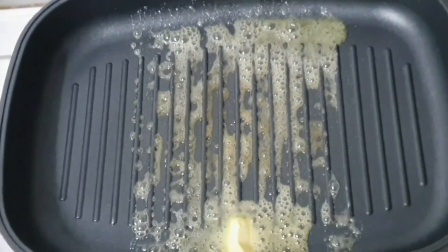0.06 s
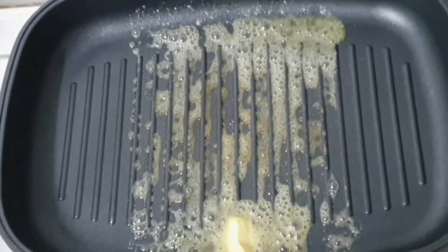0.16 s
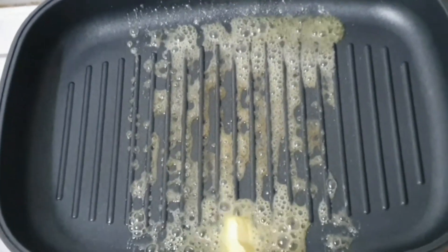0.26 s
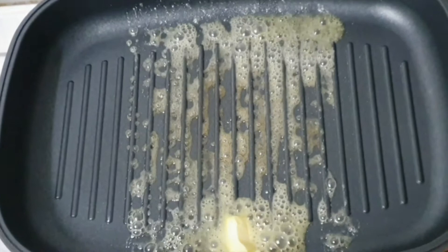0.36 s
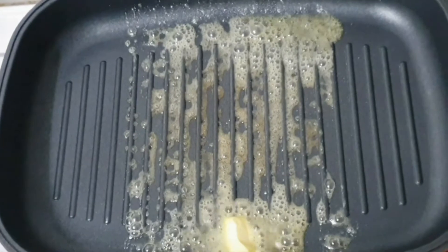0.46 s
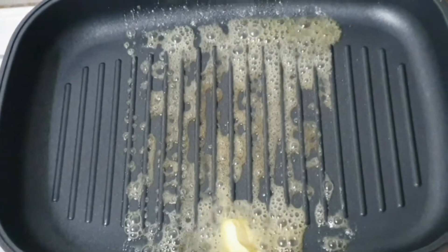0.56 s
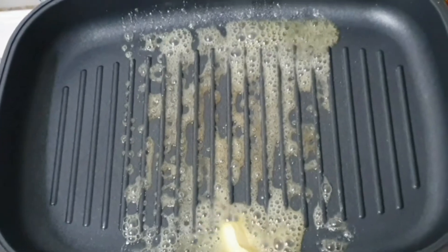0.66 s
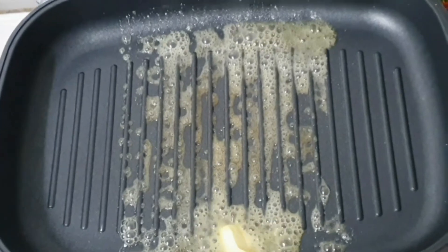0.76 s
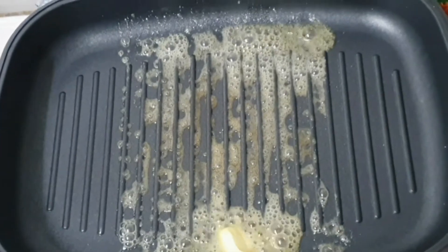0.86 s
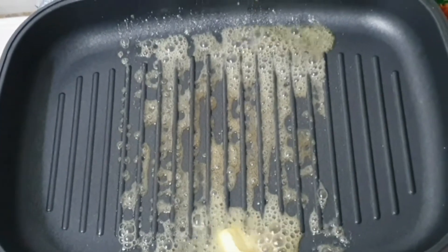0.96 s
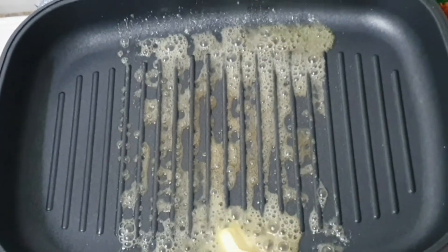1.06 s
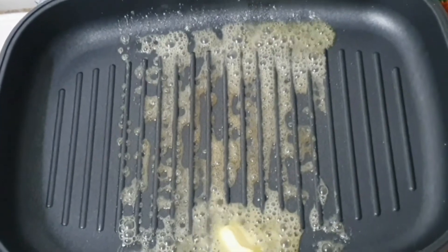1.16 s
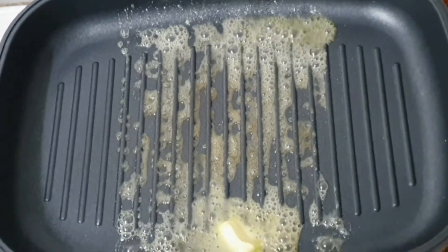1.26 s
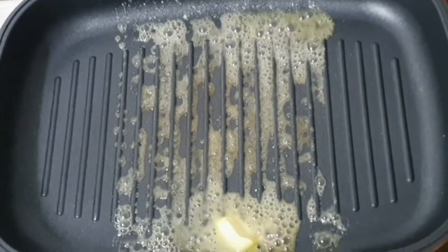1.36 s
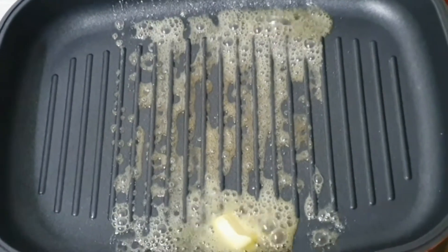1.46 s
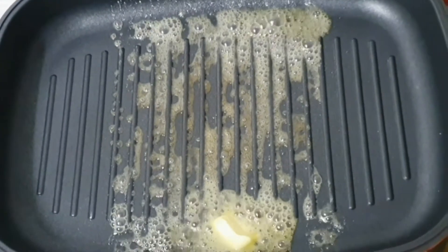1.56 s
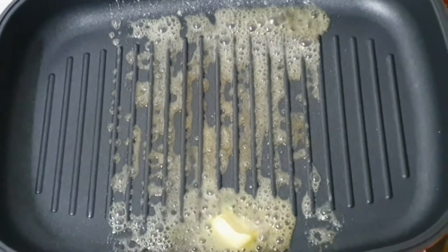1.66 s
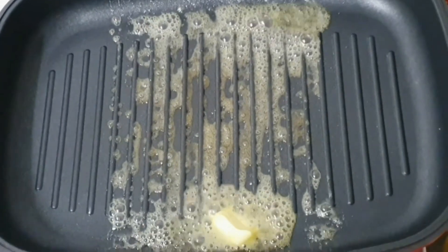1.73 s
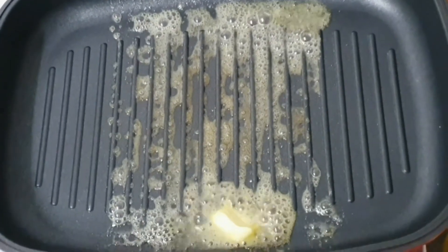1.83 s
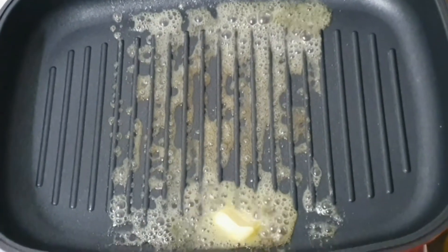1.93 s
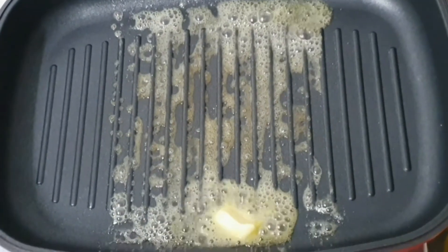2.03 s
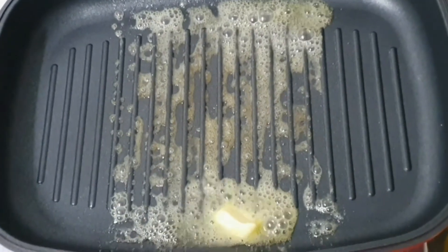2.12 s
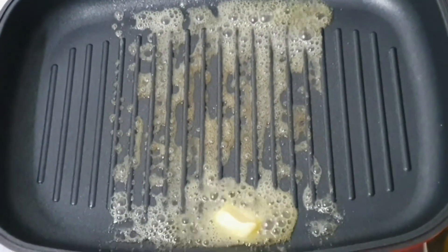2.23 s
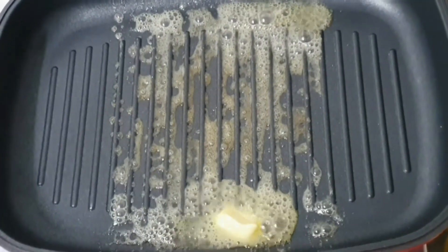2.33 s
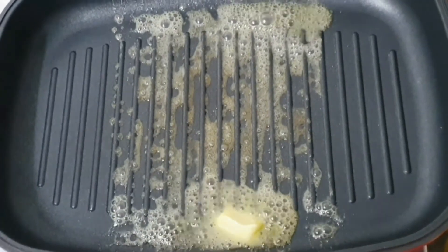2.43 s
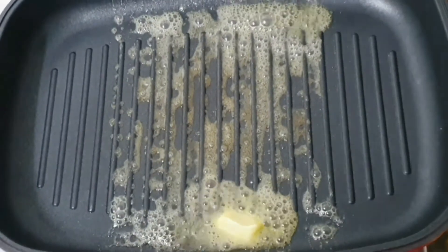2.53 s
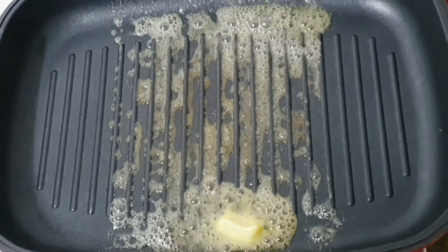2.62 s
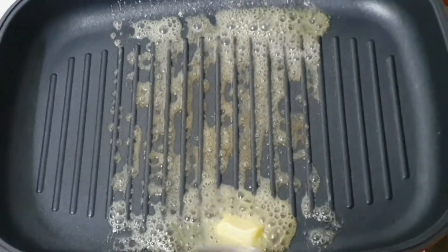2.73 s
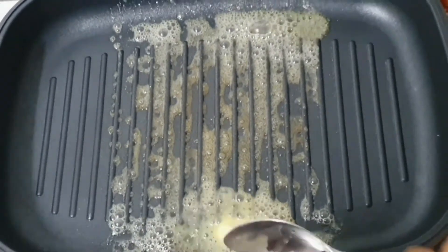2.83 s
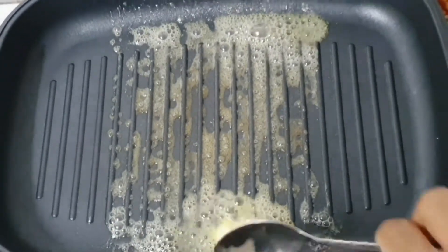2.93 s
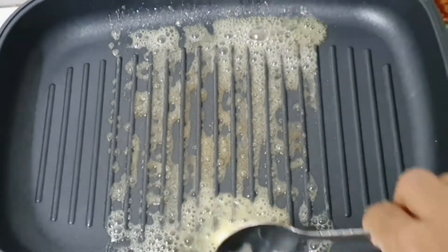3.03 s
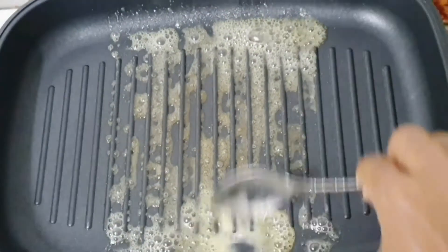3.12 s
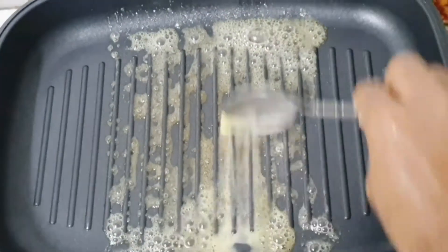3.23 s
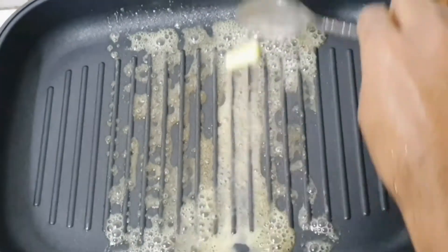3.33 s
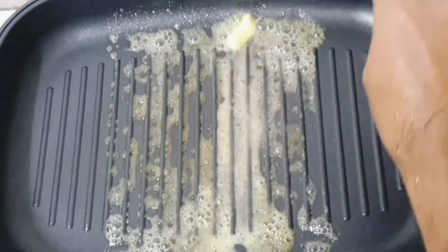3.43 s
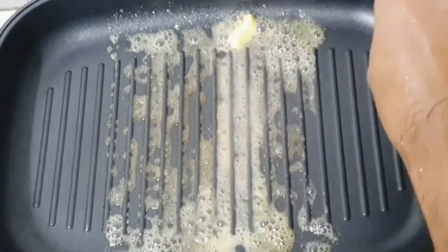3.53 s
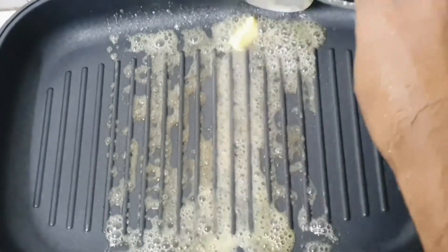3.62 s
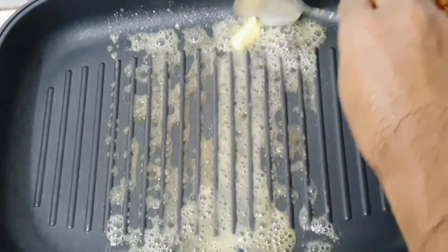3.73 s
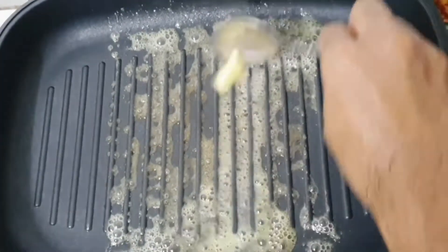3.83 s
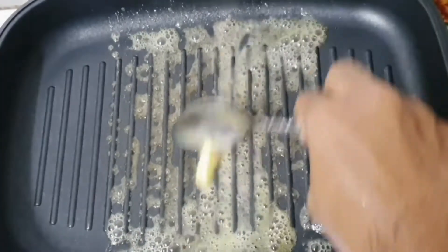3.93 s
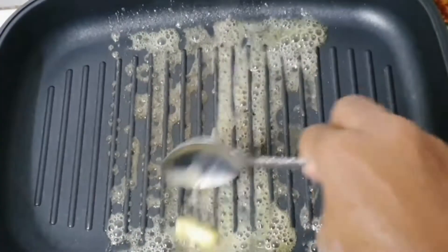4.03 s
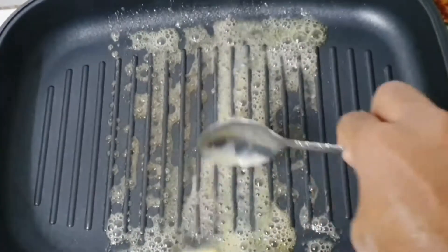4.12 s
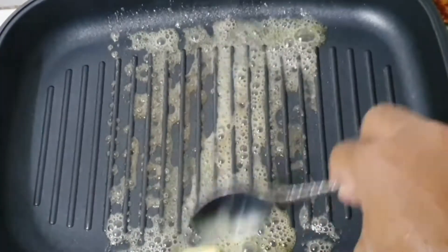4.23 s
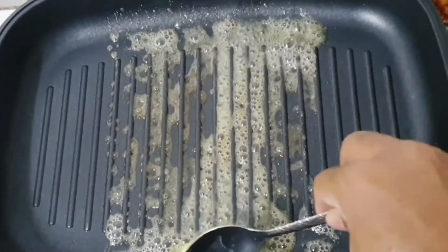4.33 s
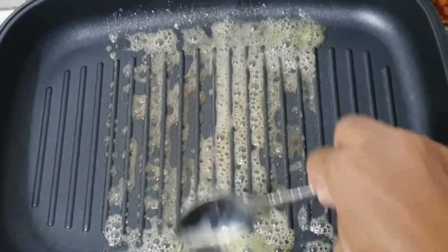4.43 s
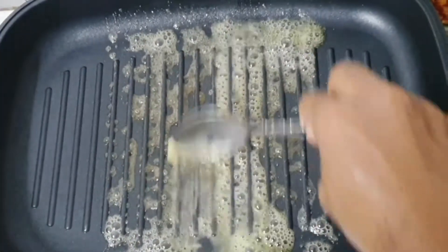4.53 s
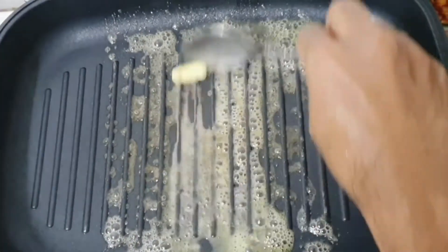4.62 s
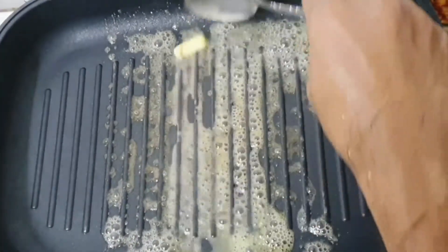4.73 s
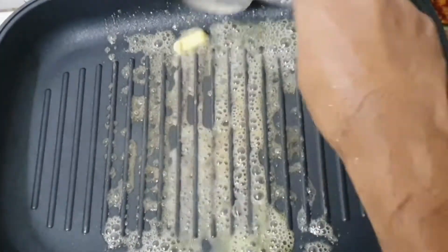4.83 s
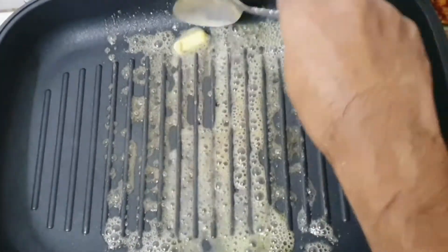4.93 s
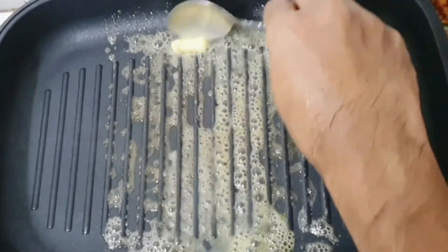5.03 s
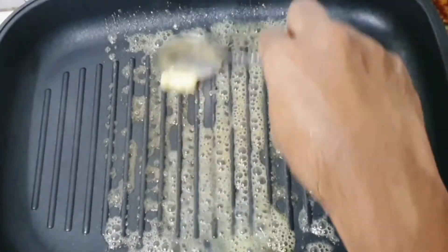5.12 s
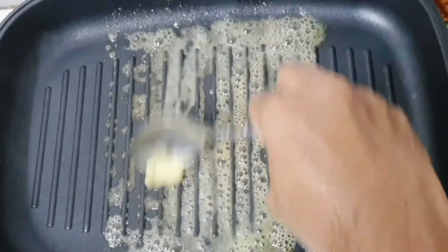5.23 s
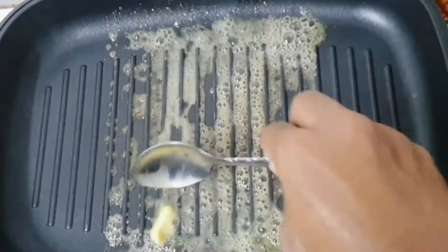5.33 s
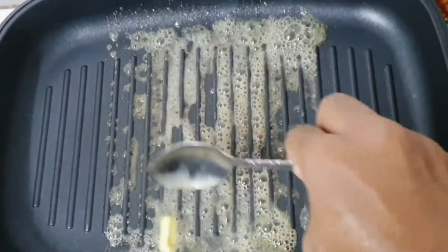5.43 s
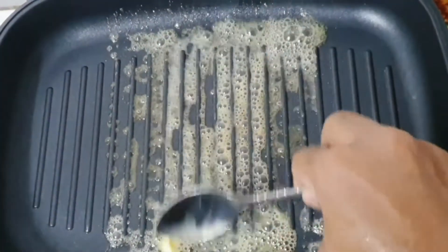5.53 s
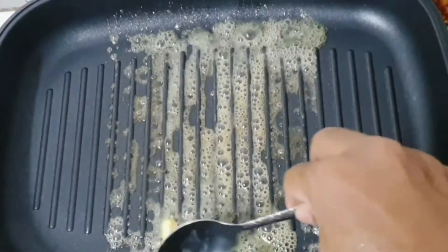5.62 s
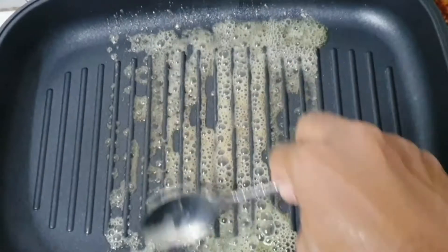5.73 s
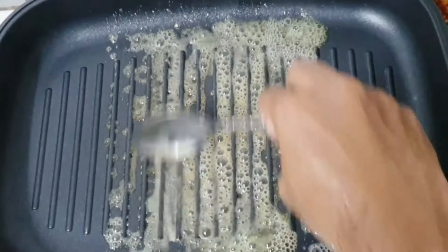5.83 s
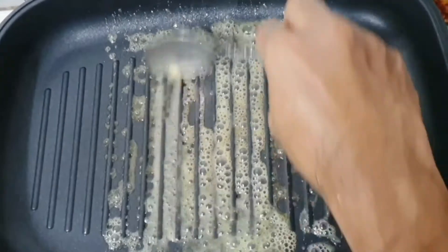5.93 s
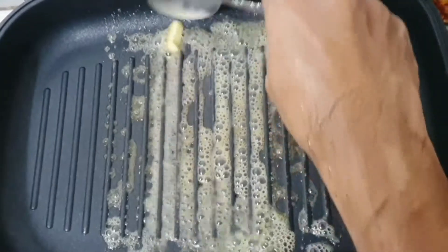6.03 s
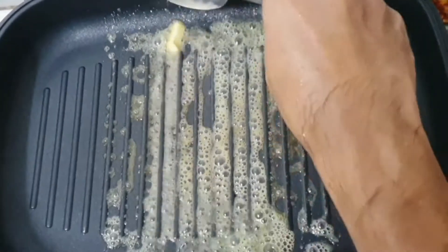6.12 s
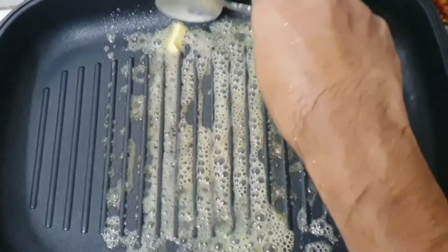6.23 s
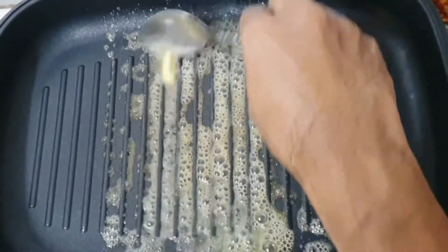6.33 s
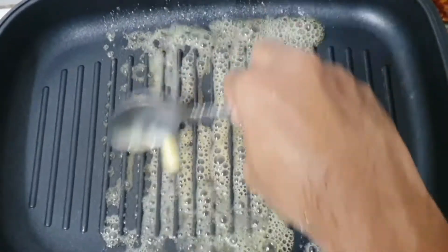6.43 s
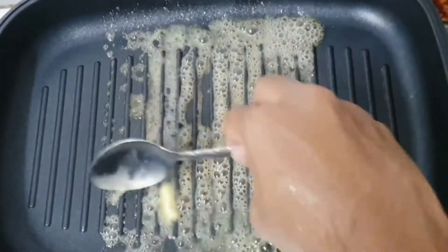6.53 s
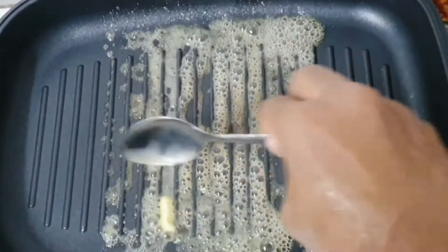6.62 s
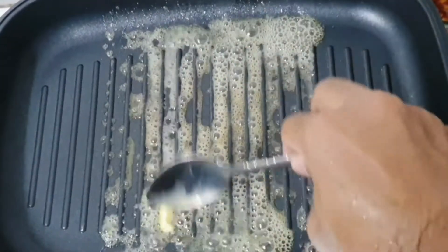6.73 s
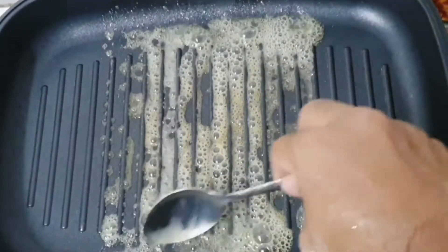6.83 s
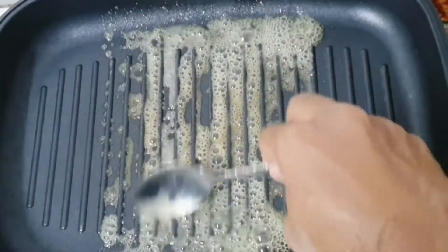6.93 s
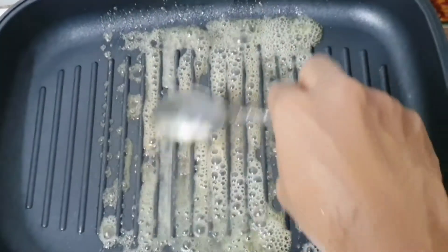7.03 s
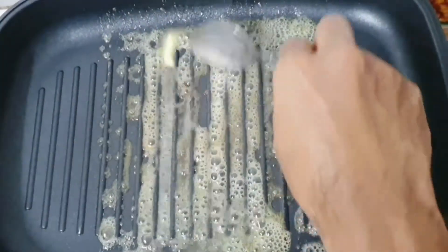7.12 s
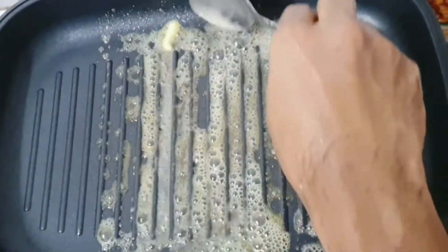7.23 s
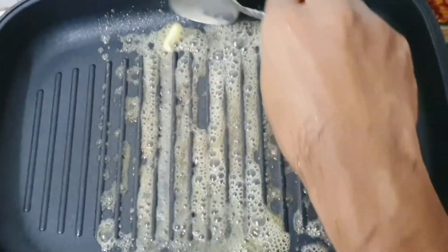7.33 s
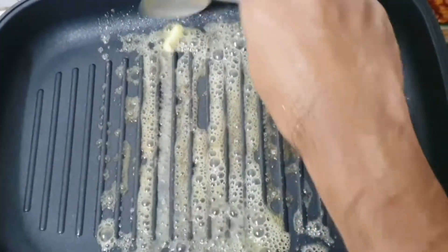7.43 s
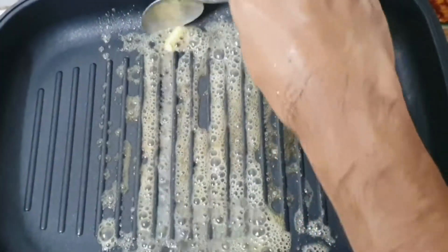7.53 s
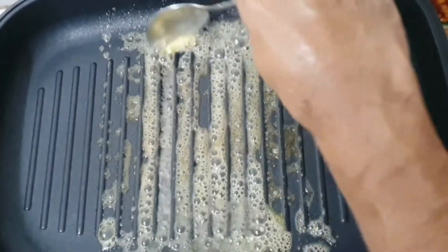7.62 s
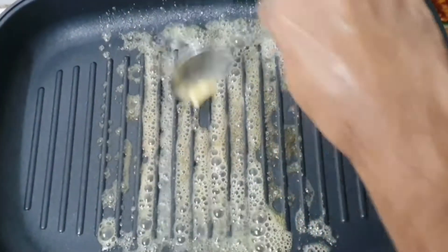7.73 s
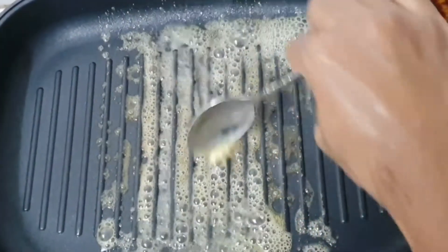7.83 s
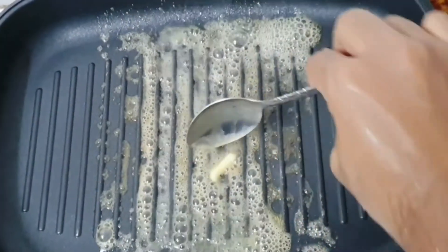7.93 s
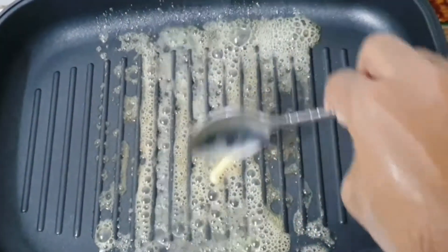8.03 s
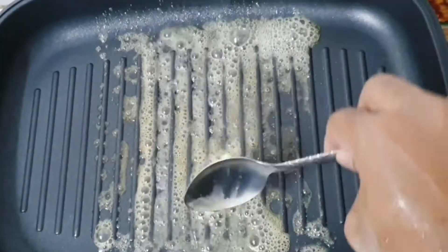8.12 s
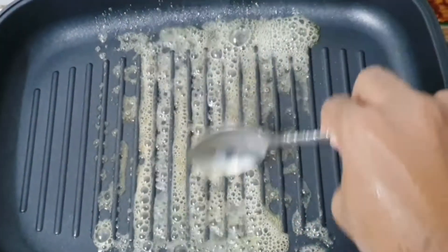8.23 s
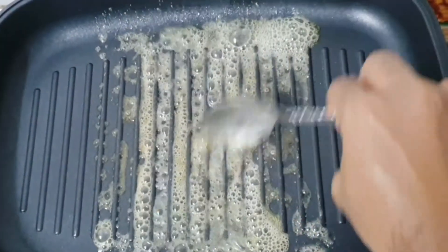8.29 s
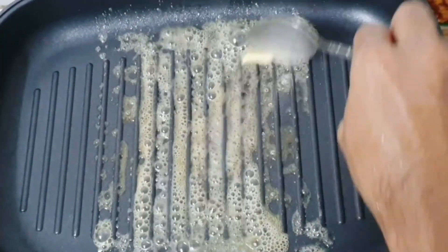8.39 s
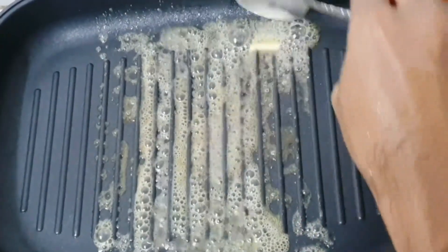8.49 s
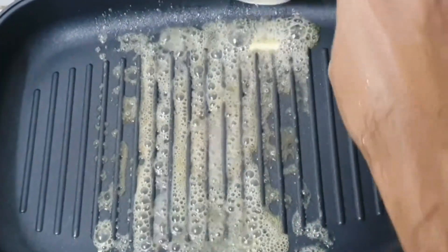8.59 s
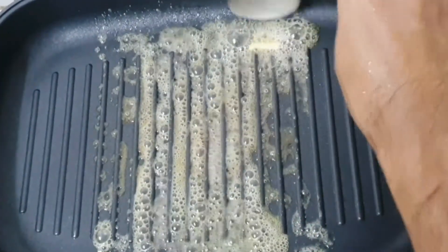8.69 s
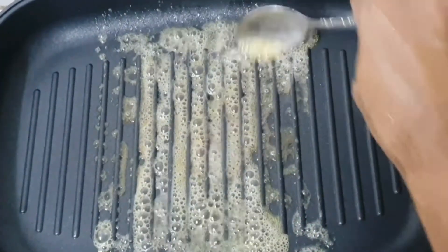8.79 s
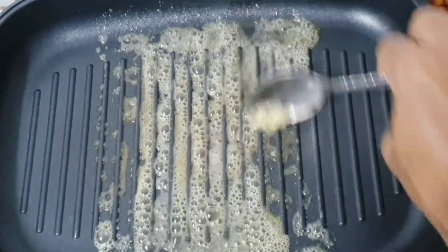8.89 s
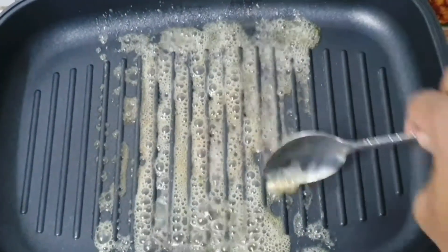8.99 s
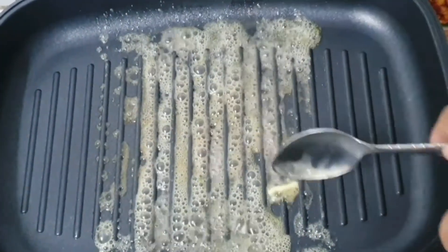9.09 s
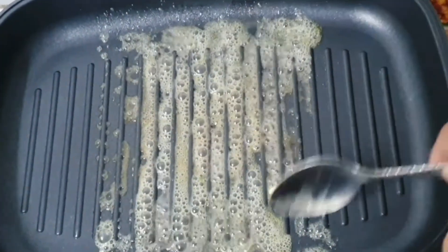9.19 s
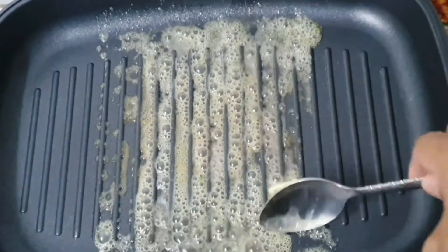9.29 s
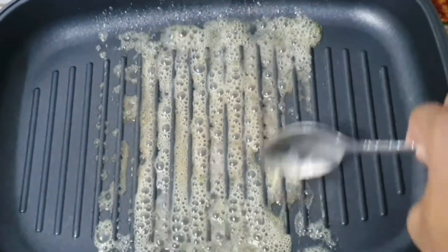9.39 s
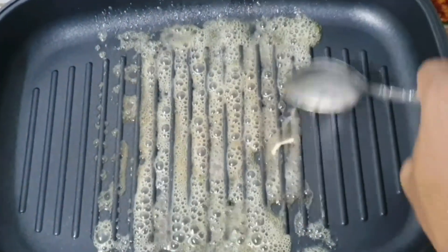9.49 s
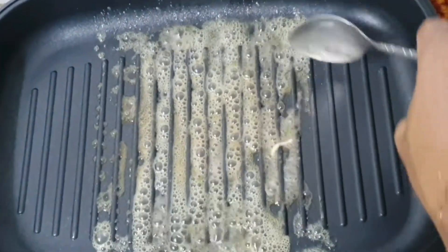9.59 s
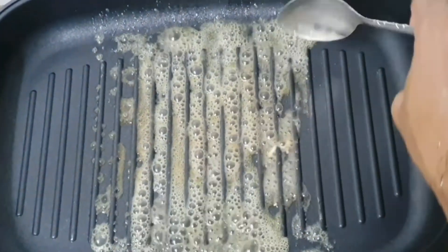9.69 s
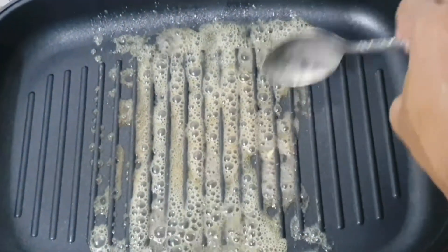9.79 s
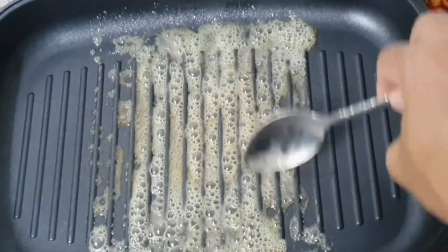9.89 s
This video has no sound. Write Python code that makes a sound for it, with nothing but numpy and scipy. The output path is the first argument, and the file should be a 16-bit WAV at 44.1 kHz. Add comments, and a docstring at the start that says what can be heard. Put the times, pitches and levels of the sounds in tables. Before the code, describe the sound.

Butter foams on a hot ridged pan with a dense, bright fizz, frequent sharp spits and lower bubble pops. At about three seconds a metal spoon starts tapping and scraping in short strokes, each pushing the butter into a brief sizzling flare. The spitting thins and the fizz gets steadier. Close stereo pickup in a small kitchen, foam stronger on the right, with low hum and rumble beneath.

```python
"""Butter foams on a hot ridged pan: steam bubbles burst in a dense fizz, made of fluttering bands of random clicks.
Louder spits and lower pops are short rising rings, each with a spray of noise.
A metal spoon taps the pan and scrapes its ridges, ringing a bank of modes; pushed butter flares up on hot metal.
A mains hum, motor tones, a swelling drone and a low appliance rumble lie below.
The small kitchen answers the spoon; the right microphone port faces the pan."""
import sys
import numpy as np
from scipy import signal
from scipy.fft import rfft, irfft
from scipy.io import wavfile
from scipy.ndimage import map_coordinates

SR = 44100
rng = np.random.default_rng(int(sys.argv[2]) if len(sys.argv) > 2 else 0)


def transcribe(u):
    """Save the signal u as a 16-bit wav file named by the first command-line argument.

    u: samples, shape (n,) or (channels, n), limited to [-1, 1]; the rate is SR.
    q: integer samples, one column per channel.
    """
    v = np.clip(np.atleast_2d(u).T, -1, 1)
    q = np.round(v * 32767).astype(np.int16)
    wavfile.write(sys.argv[1], SR, q)


N = 438774
HZ = np.maximum(np.arange(N // 2 + 1) * SR / N, 1)   # frequency of each spectrum bin

# Foam left to itself as the water boils off:
# (time [s], fizz level before trim [dB], fine hiss over fizz [dB], left over right before trim [dB])
SIMMER = [(0, -28, -9.5, -11.5), (1.2, -27.5, -10.5, -10), (2.9, -31, -12.5, -10), (4.0, -24.5, -6, -8.5),
          (6.0, -28, -1, -9), (8.0, -31, -5.5, -8.5), (9.95, -33, 0.5, -11)]
# Butter flaring on hot metal: (start time [s], peak fizz level before trim [dB])
FLARES = [(3.14, -16.5), (3.898, -53.5), (4.48, -19.5), (5.13, -25.5), (5.8, -24), (6.45, -44), (7.08, -32),
          (7.72, -30), (8.32, -29.5), (8.93, -64), (9.5, -42)]
# Tone colour of the fizz: (frequency [Hz], relative level per Hz [dB])
FIZZ_COLOUR = [(400, 10.5), (700, -24.5), (1580, -24), (2310, -20.5), (2870, -9), (3870, -11.5), (5290, -8),
               (6020, -2.5), (7250, 0.5), (7900, -7), (8400, -11), (9100, -6), (9800, -10.5), (10800, -7),
               (13000, -14), (15500, -20.5)]
# Loudest spits: (time [s], level before gain [dB], starting pitch [Hz])
SPITS = [(0.0792, -12.5, 7800), (0.2284, -11.5, 5970), (0.3576, -9.5, 7160), (0.3845, -13, 7040),
         (0.4179, -14.5, 7040), (0.5162, -10.5, 7050), (0.5314, -9, 6840), (0.8949, -14, 7140),
         (0.9348, -13, 7000), (1.1682, -10.5, 6900), (1.1967, -13.5, 6400), (1.2411, -17, 6560),
         (1.3149, -12, 7140), (1.6367, -13, 7400), (2.0467, -14, 7100), (2.0896, -11.5, 6230),
         (2.159, -12.5, 7240), (2.6564, -16, 7140), (2.6853, -10.5, 6400), (2.7776, -12, 10800),
         (5.5384, -14, 6300), (5.6735, -9, 6550), (5.8785, -15, 6900), (6.0871, -10.5, 6660),
         (7.2325, -13, 6940), (7.7583, -13.5, 7060), (8.961, -13, 6960), (9.5766, -17, 7340),
         (9.644, -15, 6360), (9.8994, -16, 6750), (0.6978, -16, 9120), (0.9363, -15, 11200),
         (1.1119, -17, 10800), (1.3069, -21, 9300), (1.337, -12.5, 7000), (1.3813, -11.5, 11100),
         (1.505, -19, 9490), (1.6082, -14, 9650), (1.7789, -19, 10900), (1.9325, -17, 10600),
         (2.2428, -17, 9130), (0.9075, -11.5, 6200), (0.95, -14, 7160), (1.006, -12, 7060),
         (1.223, -14, 7100), (2.895, -15, 6500), (5.892, -14, 6600), (0.9, -13, 7600), (0.974, -19, 6960),
         (9.027, -16.5, 7000), (7.124, -17, 7200)]
# Bigger bubbles, which burst lower: (time [s], level before gain [dB], starting pitch [Hz])
POPS = [(0.0095, -13, 3220), (0.5546, -11.5, 3030), (1.3538, -15.5, 2970), (1.6357, -13.5, 3150),
        (1.6965, -8.5, 4400), (2.2203, -14, 4280), (2.3251, -13, 2920), (2.5965, -16.5, 3060),
        (2.6973, -15.5, 3220), (2.825, -12.5, 4360), (5.539, -18, 3400), (4.157, -23, 3600)]
# Spoon strokes: (start time [s], lift-off time [s], start level [dB], lift-off level [dB],
#  middle-mode boost [dB], lowest-mode boost at lift-off [dB],
#  squeal at start [Hz], squeal at lift-off [Hz], grit over stroke [dB])
SCRAPES = [(3.073, 3.18, -36, -36, 0.5, -12, 854, 2020, 8.5),
           (3.768, 3.843, -30.5, -33, -29, -1, 4700, 2860, 9.5),
           (4.367, 4.45, -38, -42, 3.5, 3, 3070, 3880, 10),
           (4.977, 5.1, -36.5, -28.5, 3, -2, 2020, 2894, -12),
           (5.654, 5.811, -33.5, -33, 5, 8, 3840, 3800, 4),
           (6.277, 6.368, -38, -23.5, 10.5, 12.5, 2930, 1990, -9),
           (6.865, 7.035, -27.5, -30.5, 4, 10, 3935, 3860, -1),
           (7.619, 7.713, -32, -26.5, 3.5, 12.5, 3120, 1230, 1.5),
           (8.198, 8.291, -25, -35.5, 8, 16.5, 3940, 865, 3.5),
           (8.755, 8.919, -26.5, -34, 5, 10.5, 4000, 1250, -2.5),
           (9.312, 9.463, -30, -31.5, 7, 3.5, 1170, 5760, -0.5),
           (9.942, 9.942, -31, -50, 17, 0, 1230, 1240, -13)]
# Spoon taps: (time [s], relative level [dB], favoured pitch [Hz], second favoured pitch [Hz],
#  low-mode boost [dB], favoured low pitch [Hz], tick over tap before trim [dB])
TAPS = [(2.961, 6, 2900, 2730, -8.5, 628, -17), (3.0822, -7.5, 4940, 3870, 6.5, 990, 18.5),
        (3.712, 0.5, 2260, 2880, 4.5, 1150, 9), (3.7685, -2, 2950, 4860, -5, 870, 0),
        (4.2843, 0.5, 2840, 4840, -9, 640, 1), (4.376, -16, 3800, 2930, 0, 1190, 0),
        (4.4155, -1, 4850, 3900, -5.5, 816, 11), (4.996, -4, 2400, 2000, -1.5, 1210, -1),
        (5.035, 4.5, 2120, 3990, -5, 1180, -17), (5.7085, -1.5, 4080, 4890, -8, 1210, 13.5),
        (6.2902, 6, 3010, 4430, -5.5, 1180, 2), (6.345, -7, 2830, 3930, 2, 1170, -4),
        (6.358, -3.5, 2310, 3010, 10, 984, -7), (6.8701, -14, 3750, 4700, 9, 1184, 2),
        (6.965, -2.5, 2260, 5840, -10, 1200, 1), (7.013, -18, 3190, 3730, 13, 640, 0),
        (7.4981, 4.5, 2270, 3560, -12, 1180, -3), (7.62, -5, 5860, 2070, -10, 1500, 4),
        (7.627, -2, 3230, 2750, -8, 1500, 7), (7.686, -14.5, 3150, 2000, 12.5, 1284, -7),
        (8.2056, -7, 3820, 4570, 8.5, 1205, 13.5), (8.283, -6.5, 2730, 3200, 5, 795, 0),
        (8.6947, 3, 2820, 2330, -4.5, 907, -1), (8.748, 4, 2940, 4000, -17, 930, -13),
        (8.84, -15.5, 2940, 3820, 16.5, 1270, -3.5), (8.874, -9, 1995, 2980, -10, 1240, 2),
        (9.288, -0.5, 3880, 3140, -3.5, 925, -24), (9.415, -7, 1990, 2320, 12, 1000, 0),
        (9.453, -10, 5840, 4890, -10, 900, 9)]
# Modes of pan and spoon:
# (frequency [Hz], 60 dB decay time before shortening for taps and strokes [s], relative level [dB])
PAN_MODES = [(339.9, 0.85, -3), (361, 0.17, -10.5), (468, 0.52, -17), (643.3, 0.53, -21),
             (822, 0.71, -20.5), (858.5, 0.25, -14.5), (920.7, 0.3, -14), (1168, 0.17, -20),
             (1230, 0.3, -12), (1314, 0.12, -12), (1380, 0.09, -23), (1474, 0.076, -11), (1726, 0.4, -15),
             (2016, 0.24, -6), (2150, 0.17, -16), (2285, 0.59, -10.5), (2424, 0.18, -5.5),
             (2573, 0.2, -19.5), (2680, 0.26, -3.5), (2740, 0.17, -7.5), (2861, 0.15, -0.5),
             (2878, 0.14, -4.5), (3140, 0.097, -3), (3144, 0.2, -13.5), (3200, 0.14, -2), (3420, 0.22, -5),
             (3720, 0.19, -4), (3880, 0.14, -3), (3950, 0.19, -6.5), (4000, 0.14, -7), (4290, 0.11, -4),
             (4540, 0.18, -7), (4694, 0.15, -7), (4820, 0.2, -3.5), (5250, 0.13, -15), (5800, 0.16, -7),
             (5870, 0.13, -10), (6250, 0.079, 1), (6800, 0.17, -5)]
# Shading of the foam: (frequency [Hz], left over right before foam balance [dB])
FOAM_SHADE = [(700, -28), (1290, 1.5), (2380, -11), (4400, -9), (7000, -7.5), (8500, 0), (12000, -7),
              (15000, 6.5)]
# Shading of the spoon: (frequency [Hz], left over right [dB])
SPOON_SHADE = [(400, -2), (1300, -1), (2380, -4.5), (4400, -11), (8000, -2.5)]
# Likeness of the ports: (frequency [Hz], power share of direct sound at the left [0 to 1])
LIKENESS = [(300, 0.83), (700, 0.065), (1650, 0.11), (3500, 0.034), (8000, 0.0024)]
# Mains hum: (time [s], level before its waver and port balance [dB])
HUM = [(0, -39.5), (3.2, -40.5), (3.55, -39.5), (3.8, -45), (4.45, -45.5), (4.85, -41.5), (5.03, -44.5),
       (7.5, -42.5), (8.7, -43.5), (9.95, -43)]
# Faint motor tones: (frequency [Hz], level before flutter and port balance [dB])
MOTOR_TONES = [(223, -62.5), (446, -59.5), (487, -59.5), (580, -83)]
# Tone colour of the appliance rumble: (frequency [Hz], relative level per Hz [dB])
RUMBLE_COLOUR = [(12, -56), (20, -32), (43, -12), (69, -9.5), (97, -2), (121, -8), (148, -8.5), (213, -4.5),
                 (282, -15), (390, -15.5), (449, -10), (874, -24), (2500, -29), (3250, -66), (5500, -120)]

RUMBLE_DB = -46   # before it follows the hum level
FLARE_RISE_S, FLARE_HOLD_S, FLARE_FADE_DB_PER_S, FLARE_BRIGHT_DB = 0.12, 0.046, 18, 6
SWEPT_DB, SWEPT_EDGE_S = 0.5, 0.03   # change of the fizz while the spoon wipes the foam
SPREAD_S = 2.95   # the pool of butter spits often until the spoon spreads it thin
DRONE_S, DRONE_HALF_S, DRONE_DB = 7.12, 0.42, -37.5   # middle, half length, top before port balance
BEND_S = 3e-5   # spread of the time wander that bends the modes
CUTOFF_HZ = 15750


def foam_level():
    """Simmer and flares add in power; wiping shifts the sum. Gives fizz dB and hiss over fizz dB."""
    t = np.arange(N) / SR
    simmer_db, hiss_db = in_time(SIMMER)[:2]
    flare_power = 0
    for start, peak_db in FLARES:
        rise = np.clip((t - start) / FLARE_RISE_S, 0, 1)
        fading_s = np.maximum(t - start - FLARE_RISE_S - FLARE_HOLD_S, 0)
        flare_power = flare_power + (rise * amp(peak_db - FLARE_FADE_DB_PER_S * fading_s)) ** 2
    power = amp(simmer_db) ** 2 + flare_power
    swept = sum(np.clip(np.minimum(t - t0, t1 - t) / SWEPT_EDGE_S + 1, 0, 1) for t0, t1, *_ in SCRAPES)
    return 10 * np.log10(power) + SWEPT_DB * swept, hiss_db + FLARE_BRIGHT_DB * flare_power / power


def fizz():
    """Tiny bubbles burst in clumps: quarter-octave bands flutter together and apart, from two click views."""
    fizz_db, hiss_db = foam_level()
    change_db = fizz_db - np.mean(fizz_db)
    before_spread = np.arange(N) / SR < SPREAD_S
    pooled = np.where(before_spread, 1, 0.55)   # thin-spread butter fizzes more evenly
    together = drift(18.0) + 1.27 * drift(33.0)
    clicks = [grains(5000, spread_db=2.0) for _ in range(4)]
    out = np.zeros((2, N))
    for k, low in enumerate(600 * 2 ** np.arange(0, 4.8, 1 / 4)):
        hz = low * 2 ** (1 / 8)
        tilt = np.clip(np.log2(hz / 11000.0) / 2.0, -.35, 1)   # a fresh flare is brighter
        # the commonest bubble size comes in chirpy clumps
        clump_db = 2.56 * pooled * np.exp(-np.log2(hz / 6000.0) ** 2 / 0.1)
        flutter_db = 1.87 + clump_db + 1.6 * (hz < 2500)
        own_db = flutter_db * (0.94 * drift(14.6) + 0.46 * drift(54.0))
        lag_db = -.6 * change_db * (hz < 2500)   # big slow bubbles hardly join a flare
        gain = amp(lag_db + tilt * (hiss_db + 11) + 0.6 * pooled * together + own_db)
        gain = gain * np.sqrt(hz / 10800.0)
        # neighbouring bands take alternate pairs of click streams
        out += gain * rms_one(band(np.array(clicks[k % 2::2]), low, low * 2 ** (1 / 4)))
    # lone sharp snaps over a wide band, thinner once the butter is spread
    crackle = band(grains(np.where(before_spread, 300.0, 60.0), spread_db=2.0), 2400, 11000)
    out += amp(20.5) * np.array([crackle, np.roll(crackle, 60)])
    return amp(fizz_db + 3.0) * irfft(rfft(out) * amp(at_hz(FIZZ_COLOUR, HZ)), N)


def bursts(events, cycles, spray_s, gain_db):
    """A bursting bubble is a short ring rising from its pitch, with a decaying spray of band noise."""
    length = 900
    t = np.arange(length) / SR
    out = np.zeros(N + length)
    for s, db, hz in events:
        envelope = np.exp(-t * hz / cycles) * (1 - np.exp(-t * hz / 0.5))
        tone = np.sin(2 * np.pi * hz * t * (1 + 3.2 * t)) * envelope
        noise = rng.standard_normal(length)
        spray = 0.19 * band(noise, hz * 0.51, hz * 1.63) * np.exp(-t / spray_s)
        start = round(s * SR)
        out[start:start + length] += amp(db + gain_db) * (tone + spray)
    return out[:N]


def scattered(count, top_db, low_hz, high_hz, early):
    """Smaller bursts fall at random, a share before the butter is spread; they weaken as it dries."""
    when, side, size, pitch = rng.random((count, 4)).T
    s = np.where(side < early, when * SPREAD_S, SPREAD_S + when * (N / SR - SPREAD_S))
    return list(zip(s, top_db - 8.1 * size - 0.64 * s, low_hz * (high_hz / low_hz) ** pitch))


def spits_and_pops():
    """Steam bubbles burst through the butter: listed loud ones and scattered smaller ones."""
    small_spits = scattered(count=110, top_db=-18.5, low_hz=6410, high_hz=8130, early=0.46)
    small_pops = scattered(count=50, top_db=-22.5, low_hz=2780, high_hz=4470, early=0.56)
    out = bursts(SPITS, cycles=7.7, spray_s=0.0064, gain_db=9.5)
    out += bursts(POPS, cycles=2.2, spray_s=0.16, gain_db=5.0)
    out += bursts(small_spits, cycles=14.6, spray_s=0.017, gain_db=9.0)
    return out + bursts(small_pops, cycles=3.5, spray_s=0.015, gain_db=10.5)


def stroke_curves():
    """Each stroke snaps on, glides to lift-off and drops away; its low modes come up late in the stroke."""
    rows = []
    for t0, t1, db0, db1, middle, low, hz0, hz1, grit in SCRAPES:
        rows += [(t0 - .002, -80, middle, low - 12, hz0, hz1, 0, grit),
                 (t0, db0, middle, low - 12, hz0, hz1, 0, grit),
                 (t1, db1, middle, low, hz0, hz1, 1, grit),
                 (t1 + 0.02, db1 - 19.0, middle, low, hz0, hz1, 1, grit)]
    return in_time(rows)


def scraped_mode(mode, curves, rubs):
    """Ridge clicks drive one mode; the wandering contact and the passing squeal set how strongly."""
    hz, t60, db = mode
    scrape_db, middle_db, low_db, first_hz, last_hz, along, _ = curves
    colour_db = low_db if hz < 700 else middle_db if hz < 1600 else 0
    # the squeal passes from one mode to another
    squeal = sum(np.sqrt(share) * np.exp(-np.log2(hz / pitch) ** 2 / 0.0019)
                 for share, pitch in [(1 - along, first_hz), (along, last_hz)])
    contact_db = 5.1 * np.clip(drift(15.4), -3, 1.6)
    gain = amp(scrape_db + colour_db + db + 9.4 * np.minimum(squeal, 1) + contact_db)
    gain = gain / np.sqrt(t60 * SR / 28)   # evens out long and short rings
    return ring(gain * rubs, hz, t60 * 0.48)   # the pressed spoon damps the ring


def tapped_mode(mode, at):
    """A spoon edge lands sharply, its push fading within about a millisecond; each spot favours some pitches."""
    hz, t60, db = mode
    tap_db, tap_hz, second_hz, low_boost_db, low_hz, _ = np.transpose(TAPS)[1:]
    # the spot struck favours modes near two high pitches and a low one
    favour_db = 14.0 * np.exp(-np.log2(hz / (low_hz if hz < 1600 else tap_hz)) ** 2 / 0.0097)
    second_db = 10.0 * np.exp(-np.log2(hz / second_hz) ** 2 / 0.0019) * (hz > 1600)
    favour_db = np.maximum(favour_db, second_db)
    low_db = low_boost_db * (hz < 1600) - 9.6 * (hz < 500)
    blows = amp(tap_db + db - 22.5 + favour_db + low_db + rng.normal(0, 1.74, len(at)))
    blows = blows * rng.choice([-1, 1], len(at))
    n = np.arange(260)
    chatter = np.cos(2 * np.pi * hz * n / SR) + 0.13 * rng.standard_normal(260)
    chatter = chatter * np.exp(-n / 18.0)
    # same push on this mode as one click
    chatter = chatter / abs(np.sum(chatter * np.exp(-2j * np.pi * hz * n / SR)))
    landing = np.zeros(N)
    np.add.at(landing, np.add.outer(at, n), np.outer(blows, chatter))
    # a damped clank over a longer ring
    clank = ring(landing, hz, t60 * 0.71) + amp(-11.0) * ring(landing, hz, t60 * 0.19)
    return clank * [[1], [rng.choice([-1, 1]) if hz > 2600 else 1]]   # high modes may flip polarity


def contact_grit(curves, rubs, at):
    """Metal on metal gives broad grit between the modes, a crack at each tap and a tick of first contact."""
    scrape_db, middle_db, grit_db = curves[0], curves[1], curves[-1]
    taps = np.transpose(TAPS)
    tap_db, tick_db = taps[1], taps[-1]
    knocks, ticks = np.zeros((2, N))
    knocks[at] = amp(tap_db - 20.5)
    ticks[at] = amp(tap_db + tick_db - 14.0)
    rasp = amp(scrape_db + grit_db + 1.95 * drift(22)) + signal.lfilter([1], [1, -.999], knocks)
    sand = rubs + 1.5 * rng.standard_normal((2, N))
    high = rms_one(band(sand, 3440, 6300))
    middle = amp(middle_db - 15.5) * rms_one(band(sand, 1120, 2260))
    tick = signal.lfilter([1], [1, -.98], ticks) * rms_one(band(sand, 1360, 8200))
    return rasp * (high + middle) + tick


def spoon():
    """Taps and rubbing drive the same modes, with grit between them and a short answer from the walls."""
    curves = stroke_curves()
    at = [round(row[0] * SR) for row in TAPS]
    rubs = np.array([rms_one(grains(2000, spread_db=3.0) * amp(3.25 * drift(86))) for _ in range(2)])
    modes = np.zeros((2, N))
    for mode in PAN_MODES:
        modes += scraped_mode(mode, curves, rubs) + tapped_mode(mode, at)
    # the pressing spoon bends every mode a little up and down
    bent = np.arange(N) + BEND_S * SR * drift(9.2)
    places = [np.arange(2)[:, None] + 0 * bent, [bent, bent]]
    modes = map_coordinates(modes, places, order=3, mode="nearest")
    direct = band(modes, 430, 8900)   # keep the spoon's ringing mostly between these pitches
    direct = direct + contact_grit(curves, rubs, at)
    n = np.arange(12000)
    walls = rng.standard_normal((2, 12000)) * amp(-60 * n / SR / 0.48)   # 60 dB per 0.48 s
    tail = signal.fftconvolve(direct, walls, axes=1)
    return direct + amp(-37.5) * tail[:, :N]


def ports(direct, other, shade):
    """The right port hears the source; the left hears it shaded, a little early and mixed with reflected sound."""
    alike = np.clip(at_hz(LIKENESS, HZ), 0, 1)
    left = np.sqrt(alike) * rfft(np.roll(direct, -4)) + np.sqrt(1 - alike) * rfft(other)
    return np.array([irfft(left * amp(at_hz(shade, HZ)), N), direct])


def kitchen():
    """Wavering sines make hum, motor tones and drone; shaped noise makes a rumble that follows the hum level."""
    t = np.arange(N) / SR
    hum_db = in_time(HUM)[0]
    hum = amp(hum_db + 0.63 * drift(3.3)) * np.sin(2 * np.pi * 100 * t + 0.17 * drift(1.9))
    drone_db = DRONE_DB - 10 * ((t - DRONE_S) / DRONE_HALF_S) ** 4   # swells and fades
    drone = amp(drone_db) * np.sin(2 * np.pi * 55.5 * t + 0.41 * drift(1.4))
    motors = sum(amp(db + 5.3 * drift(14.5)) * np.sin(2 * np.pi * hz * t + drift(2.6))
                 for hz, db in MOTOR_TONES)
    mid, side = irfft(rfft(rng.standard_normal((2, N))) * amp(at_hz(RUMBLE_COLOUR, HZ)), N)
    # the ports differ more as pitch rises
    side = irfft(rfft(side) * np.clip(HZ / 1500, .3, 1) ** 1.7, N)
    rumble_gain = amp(RUMBLE_DB + 0.82 * (hum_db + 43))
    rumble = rumble_gain * (mid + side * [[1], [-1]]) / np.std(mid)
    # root two turns rms levels into sine peaks
    return np.sqrt(2) * (hum + drone + motors) * amp([[-.4], [.4]]) + rumble


def amp(db):
    """dB to gain."""
    return 10 ** (np.asarray(db) / 20)


def rms_one(x):
    """Scale to rms 1."""
    return x / np.sqrt(np.mean(x ** 2) + 1e-20)


def in_time(rows):
    """Columns of a curve table at every sample."""
    s, *columns = np.transpose(rows)
    return [np.interp(np.arange(N) / SR, s, c) for c in columns]


def at_hz(points, hz):
    """Read a spectrum on a log-frequency axis."""
    points = np.array(points, float)
    return np.interp(np.log(hz), np.log(np.maximum(points[:, 0], 1)), points[:, 1])


def drift(rate):
    """Slow random wander of spread 1: noise through two equal poles, faster with rate in Hz."""
    r = np.exp(-40 * np.pi * rate / SR)   # runs at a twentieth of the sample rate
    noise = rng.standard_normal(N // 20 + 4002)
    slow = signal.lfilter([1], [1, -2 * r, r * r], noise)[4000:]   # drop the settling part
    return np.interp(np.arange(N) / 20, np.arange(len(slow)), rms_one(slow))


def ring(clicks, hz, t60):
    """A two-pole resonator: a unit click sets a decaying sine of height 1 ringing."""
    r, w = amp(-60 / (t60 * SR)), 2 * np.pi * hz / SR
    return signal.lfilter([0, np.sin(w)], [1, -2 * r * np.cos(w), r * r], clicks + 1e-18)


def band(x, low_hz, high_hz):
    """Gentle band-pass."""
    edges = [low_hz, min(high_hz, SR * .45)]
    return signal.sosfilt(signal.butter(2, edges, "band", fs=SR, output="sos"), x)


def grains(per_s, spread_db):
    """Random clicks, many small and a few large."""
    sizes = amp(spread_db * np.minimum(rng.exponential(1, N), 5)) * rng.choice([-1, 1], N)
    return sizes * (rng.random(N) < per_s / SR)


def scene():
    """Foam, spits and spoon at the two ports over the kitchen floor."""
    near, far = fizz()
    spits = spits_and_pops()
    echo = np.roll(spits, 140)   # the pan wall sends the spits to the left port late
    foam = ports(near + spits, far + echo, shade=FOAM_SHADE)
    foam[0] *= amp(in_time(SIMMER)[2] + 6.5)
    return foam + ports(*spoon(), shade=SPOON_SHADE) + kitchen()


def record(dry):
    """Peaks are rounded, the top is cut."""
    rounded = 1.2 * np.tanh(dry / 1.2)
    return signal.sosfilt(signal.cheby2(14, 60, CUTOFF_HZ, fs=SR, output="sos"), rounded)


dry = scene()
out = record(dry)
transcribe(out)
```